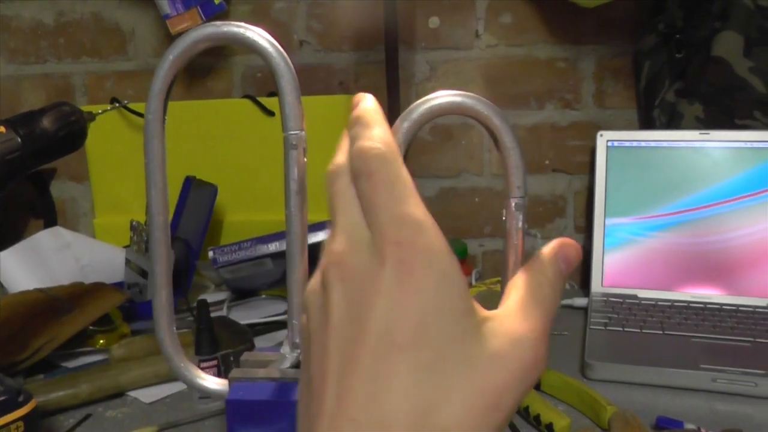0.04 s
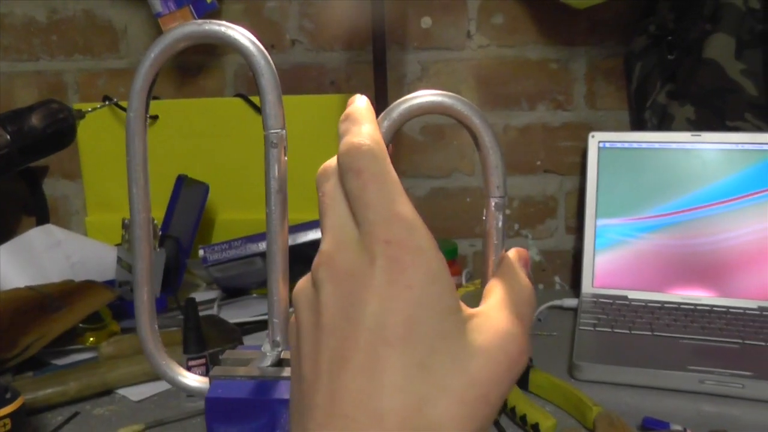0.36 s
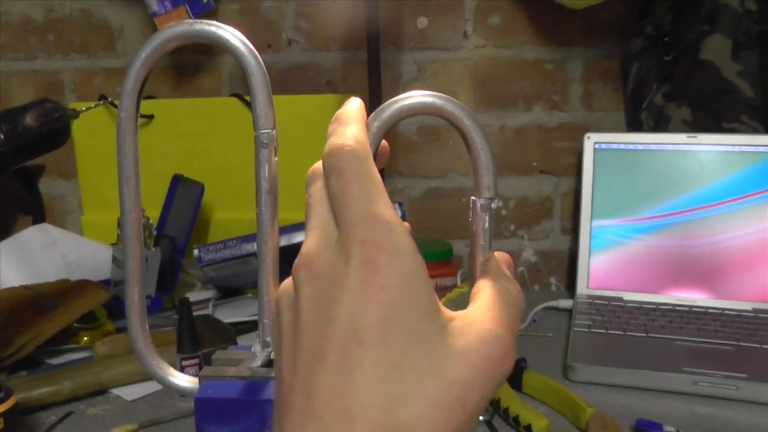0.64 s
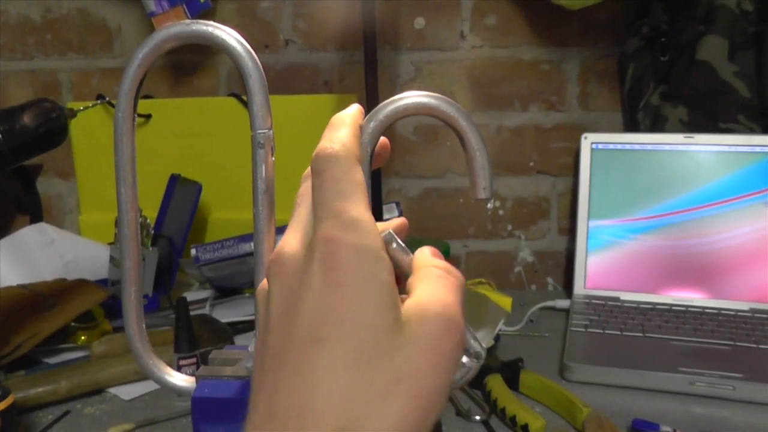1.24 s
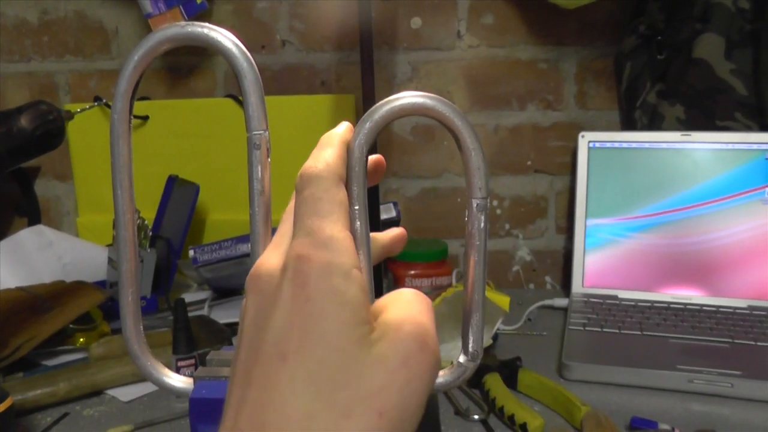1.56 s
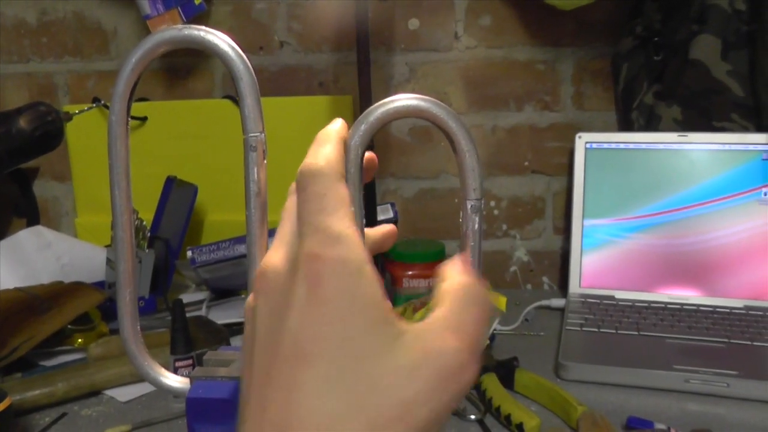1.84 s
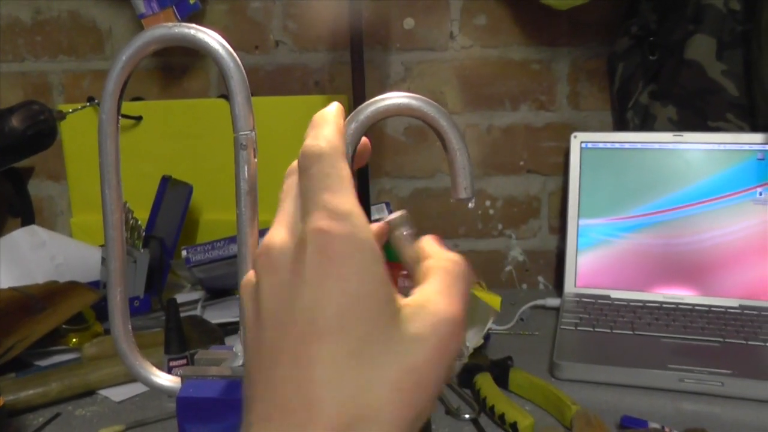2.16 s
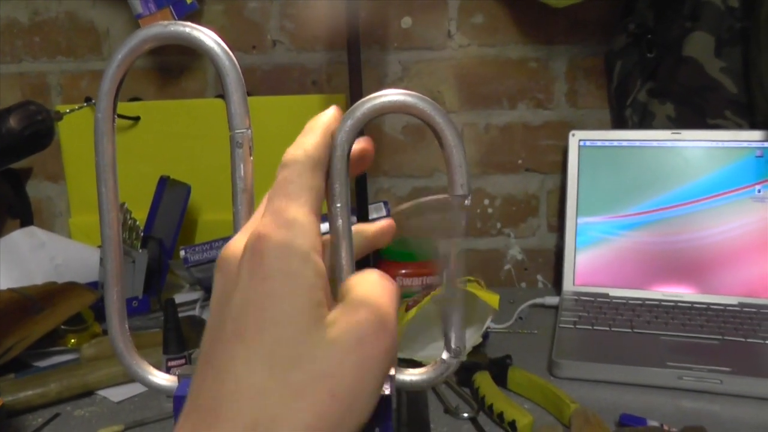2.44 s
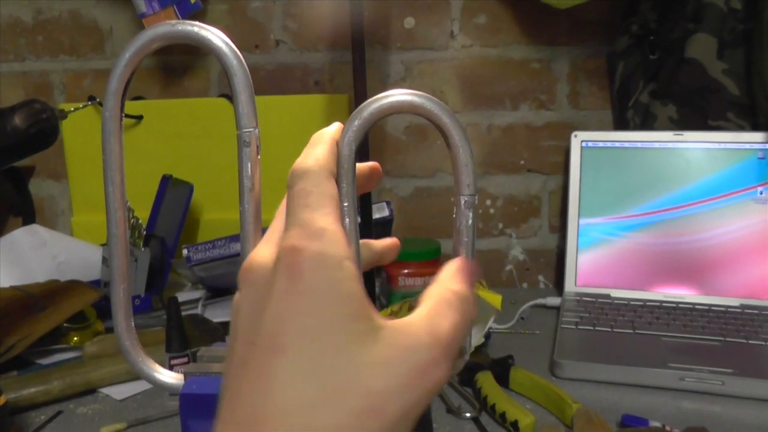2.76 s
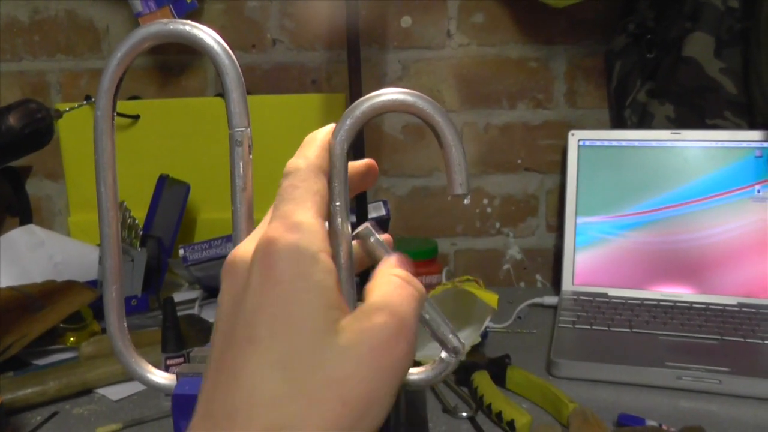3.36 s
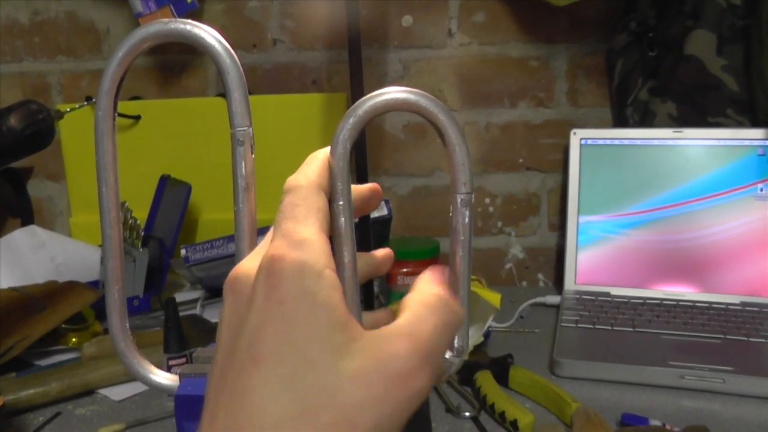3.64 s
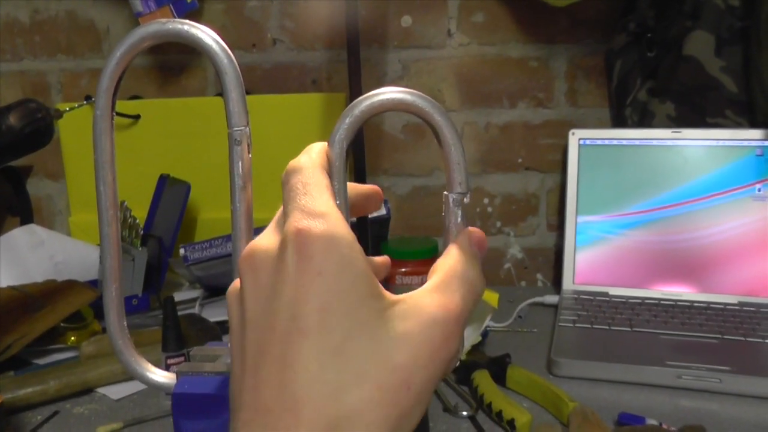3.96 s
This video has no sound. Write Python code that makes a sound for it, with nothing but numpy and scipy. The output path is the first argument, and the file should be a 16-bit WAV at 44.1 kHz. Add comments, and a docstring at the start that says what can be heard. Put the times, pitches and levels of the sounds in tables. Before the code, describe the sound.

Close up in a quiet workshop, a thumb opens a carabiner gate with small dull knocks and lets it spring shut with a crisp metallic click. This happens three times at an even pace, over a very faint hum.

```python
"""A small knock sounds over a faint hum: a thumb is pushing open the sprung gate of a metal carabiner.
Three times the gate opens, with knocks and an occasional squeak, then slips free, swings back,
grazes the nose and snaps shut. Each impact excites the damped modes of the frame, and the small,
quiet workshop answers with brief reflections and a low boom."""
import sys
import numpy as np
from scipy import signal
from scipy.fft import rfft, irfft
from scipy.io import wavfile

SR = 44100
rng = np.random.default_rng(int(sys.argv[2]) if len(sys.argv) > 2 else 0)


def master_out(mix):
    """Clip the mix to full scale and print it as 16-bit PCM to the path in sys.argv[1]."""
    frames = np.transpose(np.atleast_2d(mix))
    ceiling = np.clip(frames, -1, 1)
    pcm = np.round(ceiling * 32767).astype(np.int16)
    wavfile.write(sys.argv[1], SR, pcm)


N = 176400
T = np.arange(N) / SR
AGE = np.arange(-SR // 20, SR // 2) / SR   # seconds around one event


# The gate hits the nose. Each row: time in seconds, level in dB, left minus right in dB,
# relative level of the lingering mode in dB.
SNAPS = [(1.5125, 2, 0.7, 2.5), (2.5412, 2.5, 0.9, 6.5), (3.495, 3, 0.3, -4)]
# Touches just before a hit. Each row: nominal lead in seconds, level in dB.
GRAZES = [(0.003, -17.5), (0.0009, -11.5)]
# Spectra of the hard first impact, the crack of metal on metal, and the jolt that shakes the
# microphones through the bench. Each row: frequency in Hz, gain in dB.
IMPACT_SPECTRUM = [(300, -8), (2000, -5.5), (6500, -4.5), (9000, 0), (16000, 1.5)]
CRACK_SPECTRUM = [(30, -13), (160, 0), (620, -9.5), (950, -0.5), (1900, -2.5), (2600, -6.5), (4300, -7),
                  (7200, 0.5), (7800, -11), (8600, 6), (11700, 2.5), (12700, -8.5), (14500, -6.5),
                  (16500, -25)]
JOLT_SPECTRUM = [(30, -6.5), (200, -2.5), (400, 3.5), (800, -8.5), (2000, -34.5)]
# Modes of the hand-damped frame and of the swinging gate.
# Each row: frequency in Hz, gain in dB, 60 dB decay time in seconds.
FRAME_MODES = [(1020, 6, .035), (1241, -4.5, 0.028), (1640, 2, .025), (1780, 6, 0.02), (3020, -4.5, .04),
               (3870, 2.5, .04), (4720, -6.5, 0.058), (5090, 1, .03), (6470, -1.5, .02), (6880, 6, 0.012),
               (11420, -4.5, .008)]
SWING_MODES = [(1150, -1, .05), (1700, -1, .02), (7895, -23, 0.0011)]
GRIND_RISE_S, GRIND_FALL_S = .0013, .0035

def snaps():
    """Impact excitation: the gate swings back, strikes the nose and grinds home; the frame rings."""
    lingering_hz, lingering_t60 = 2756, .37   # one mode escapes the hand
    out = np.zeros((2, N))
    for s, db, pan_db, lingering_db in SNAPS:
        grazes = sum(from_db(level) * click(-lead * rng.uniform(.85, .99)) for lead, level in GRAZES)
        impact = coloured(click(0), IMPACT_SPECTRUM)
        grind = friction(GRIND_RISE_S, GRIND_FALL_S)
        crack = coloured(impact + grazes + grind, CRACK_SPECTRUM)
        # no two hits excite the modes quite alike
        modes = [(hz, gain + 2 * rng.standard_normal(), t60) for hz, gain, t60 in FRAME_MODES]
        frame = ring(click(0), modes + [(lingering_hz, lingering_db, lingering_t60)])
        hinge = from_db(7.5) * ring(friction(rise_s=.007, fall_s=GRIND_FALL_S), SWING_MODES)
        jolt = np.array([coloured(friction(.0015, .0015), JOLT_SPECTRUM) for _ in range(2)])
        stereo_gain = from_db([[db + pan_db / 2], [db - pan_db / 2]])
        add(out, s, (crack + frame + hinge + jolt) * stereo_gain)
    return out


# The gate slips under the thumb. Each row: start in seconds, rise time in seconds,
# then the drive of thump, gate and tick, each in dB.
KNOCKS = [(0.4735, 0.0034, 0.5, -6, -21), (0.99, 0.0045, -6, -10.5, -29.5),
          (1.188, 0.0015, -40, -25, -42.5), (1.480, 0.0014, -18.5, -12, -31),
          (2.176, 0.0026, -0.5, 1.5, -18.5), (2.4996, .0017, -7.5, -2, -21.5), (3.135, 0.0038, 0, -8, -31),
          (3.167, 0.0008, -20, -40, -28.5), (3.2531, 0.002, -5.5, 0, -16.5),
          (3.328, 0.00096, -24, -12.5, -23), (3.339, 0.00095, -14, -12.5, -28.5),
          (3.4376, .0015, -26, -8.5, -34)]
# Soft bumps of the hand. Each row: time in seconds, level in dB.
BUMPS = [(1.702, -16), (2.084, -14), (2.115, -11), (2.72, -15)]
# Modes of hand and bench, of the gate and of the spring.
# Each row: frequency in Hz, gain in dB, 60 dB decay time in seconds.
THUMP_MODES = [(255, 1, 0.075), (407, -4.5, 0.038)]
GATE_MODES = [(743, -3, 0.029), (1002, -4.5, 0.019), (1260, -2, 0.028), (1717, 3.5, .022),
              (1980, -3.5, 0.026)]
SPRING_MODES = [(5160, 4.5, 0.047), (5720, -2, 0.0106)]
# Spectrum of a knock's tick. Each row: frequency in Hz, gain in dB.
TICK_SPECTRUM = [(150, -19.5), (500, -7.5), (1500, -9), (3200, -8), (4500, -9.5), (6800, 0), (7800, -11.5),
                 (10000, 4.5), (12000, -14.5), (16000, -12.5)]

def knocks():
    """Transient excitation: brief slips and bumps set hand, bench, gate and spring ringing."""
    forces = np.zeros((3, N))
    for s, rise, *levels_db in KNOCKS:
        age = np.clip(AGE / rise, 0, 40)
        envelope = np.sqrt(age) * np.exp(-age / 2)
        add(forces, s, from_db(levels_db)[:, None] * slips(envelope))
    thump, gate, tick = forces
    for s, db in BUMPS:
        add(thump, s, from_db(db) * click(0))
    lowpass = signal.butter(4, 1840, fs=SR, output="sos")   # keeps the knock's body dull
    body = ring(gate, GATE_MODES) + ring(thump, THUMP_MODES)
    out = signal.sosfilt(lowpass, body) + coloured(tick, TICK_SPECTRUM)
    twang = ring(friction(GRIND_RISE_S, GRIND_FALL_S), SPRING_MODES)
    add(out, 3.255, from_db(-4) * twang)   # the spring jumps once in its bore
    return out


# Hinge squeaks. Each row: peak time in seconds, half length in seconds, pitch in Hz, level in dB,
# extra gain of the overtones in dB.
SQUEAKS = [(2.176, 0.0049, 2190, -46.5, -22.5), (3.1055, 0.0058, 2252, -48.5, -10)]
# The squeak's harmonics, fundamental first. Each entry: gain in dB.
SQUEAK_HARMONICS = [3.5, 3, 11, 12.5, 12, 3, -8]

def squeaks():
    """Stick-slip oscillation: the dry hinge gives brief harmonic tones, rough in pitch and level."""
    out = np.zeros(N)
    for s, half, hz, db, overtones_db in SQUEAKS:
        pitch = hz * (1 + .018 * drift(1310, AGE))
        phase = 2 * np.pi * np.cumsum(pitch) / SR
        tone = sum(from_db(gain + overtones_db * (k > 1)) * np.sin(k * phase)
                   for k, gain in enumerate(SQUEAK_HARMONICS, start=1))
        rasp = 1 + .56 * drift(901, AGE)
        add(out, s, from_db(db) * tone * swell(half) * rasp)
    return out


# Each row: peak time in seconds, half length in seconds, level in dB, pitch in Hz.
SQUEAK_AND_HISSES = [(0.578, 0.014, -72.5, 2250), (1.043, 0.026, -73, 6540), (2.28, 0.077, -77.5, 10500),
                     (3.15, 0.066, -71.5, 6700), (3.214, .025, -72, 10100)]

def squeak_and_hisses():
    """Narrow-band noise: a faint squeak, then soft high hisses of the sliding thumb."""
    decay_cycles = 16
    out = np.zeros(N)
    for s, half, db, hz in SQUEAK_AND_HISSES:
        band = ring(rng.standard_normal(len(AGE)), [(hz, 0, decay_cycles / hz)])
        add(out, s, from_db(db) * band / band.std() * swell(half))
    return out


# Spectra of the echoes from bench and walls. Each row: frequency in Hz, gain in dB.
BENCH_SPECTRUM = [(100, -1), (1000, -4.5), (5000, 0.5), (16000, -4.5)]
WALL_SPECTRUM = [(60, -11), (250, -2), (1800, -6), (3400, -6), (5800, -6), (9500, -10.5), (12000, -15),
                 (16000, -15.5)]

def reflections(direct):
    """Reverberation as convolution: the bench answers at once, the walls later and for longer."""
    bench = echoes(BENCH_SPECTRUM, t60=.022, lag_s=0)
    walls = echoes(WALL_SPECTRUM, t60=.18, lag_s=.0071)
    return signal.fftconvolve(direct, bench + walls, axes=1)[:, :N]


# Low room modes. Each row: frequency in Hz, gain in dB, 60 dB decay time in seconds.
ROOM_MODES = [(166.3, 9.5, .42), (187.5, 8.5, 0.83), (209.8, 8.5, 0.23), (218.5, 13, 0.27),
              (242.6, 10, .25)]

def room_boom():
    """Standing waves: each snap excites the low modes of the room a moment later."""
    push = np.zeros(N)
    for s, db, *_ in SNAPS:
        add(push, s, from_db(db) * click(delay_s=.0076))
    return ring(push, ROOM_MODES)


# Spectrum of the room's air. Each row: frequency in Hz, relative level in dB.
AIR_SPECTRUM = [(25, -18), (90, -9), (135, -13.5), (200, -3.5), (250, -16.5), (300, -4.5), (350, -16),
                (600, -18.5), (850, -15), (2000, -26.5), (4300, -40.5), (5600, -28.5), (7700, -35.5),
                (9500, -30.5), (15000, -33.5), (16500, -50)]
# The hum swells and fades. Each row: time in seconds, level in dB.
HUM_LEVELS = [(0, -81), (.65, -70), (1.3, -78), (1.8, -71), (2.1, -63.5), (2.35, -74), (3.05, -83),
              (3.75, -76)]

def background():
    """Ambient noise: steady room air under a hum that wavers by random frequency modulation."""
    air = np.array([unit(coloured(c, AIR_SPECTRUM)) for c in wide_noise(np.ones(N))]) * np.sqrt(N)
    hum_hz = 139.3 + 1.3 * drift(16, T)
    hum = np.sqrt(2) * np.sin(2 * np.pi * np.cumsum(hum_hz) / SR)
    hum_db = np.interp(T, *np.transpose(HUM_LEVELS))
    return from_db(-69) * air + from_db(hum_db) * hum


# Stereo width of air and echoes. Each row: frequency in Hz, side relative to mid in dB.
WIDTH = [(100, -13.5), (600, -4.5), (1600, -13), (5000, -10.5), (9000, -0.5)]

def wide_noise(envelope):
    """Partial coherence: mid and side noises share the energy, widest in the treble."""
    mid, side = (unit(envelope * w) for w in rng.standard_normal((2, len(envelope))))
    mid = coloured(mid, [(hz, -10 * np.log10(1 + from_db(db) ** 2)) for hz, db in WIDTH])
    side = coloured(side, [(hz, -10 * np.log10(1 + from_db(-db) ** 2)) for hz, db in WIDTH])
    return np.array([mid + side, mid - side])


def echoes(spectrum, t60, lag_s):
    """Diffuse decay: dense echoes merge into exponentially dying stereo noise."""
    t = T[:SR // 3]
    decay = np.exp(-np.log(1000) * t / t60) * (t > lag_s)
    return np.array([coloured(c, spectrum) for c in wide_noise(decay)])


def friction(rise_s, fall_s):
    """Sliding friction: slips swell and die exponentially."""
    return slips(np.exp(-np.minimum(np.maximum(-AGE / rise_s, AGE / fall_s), 20)))


def slips(envelope):
    """Broadband forcing: a run of tiny slips, whitened to favour no pitch, with unit energy."""
    force = rng.standard_normal(len(envelope)) * envelope
    window = np.tanh(10 * (envelope / envelope.max()))
    for _ in range(2):
        flat_spectrum = np.exp(1j * np.angle(rfft(force)))
        force = irfft(flat_spectrum, len(force)) * window
    return unit(force)


def click(delay_s):
    """Unit impulse: one ideal contact."""
    return 1.0 * (np.arange(len(AGE)) == SR // 20 + int(delay_s * SR))


def ring(force, modes):
    """Modal superposition: damped resonators respond in parallel to one force."""
    out = 0
    for hz, db, t60 in modes:
        radius = from_db(-60 / (t60 * SR))
        poles = [1, -2 * radius * np.cos(2 * np.pi * hz / SR), radius ** 2]
        gain = from_db(db) * (1 - radius ** 2) / 2
        out = out + gain * signal.lfilter([1, 0, -1], poles, force + 1e-18)
    return out


def coloured(x, points):
    """Minimum-phase filtering: a causal response follows the (Hz, dB) points."""
    size = 8192
    hz, db = np.transpose(points)
    grid = np.maximum(np.arange(size // 2 + 1) * SR / size, 1)
    gain = from_db(np.interp(np.log(grid), np.log(hz), db))
    cepstrum = irfft(np.log(gain))
    cepstrum[1:size // 2] *= 2
    cepstrum[size // 2 + 1:] = 0
    response = irfft(np.exp(rfft(cepstrum)))[:size // 2]
    return signal.fftconvolve(x, response)[:len(x)]


def drift(rate_hz, t):
    """Random modulation with a spread of about one."""
    return np.interp((t - t[0]) * rate_hz, np.arange(4096), rng.standard_normal(4096))


def swell(half_s):
    """Gaussian envelope around an event."""
    return np.exp(-np.minimum((AGE / half_s) ** 2, 20))


def from_db(db):
    """Decibels as an amplitude ratio."""
    return 10 ** (np.asarray(db) / 20)


def unit(x):
    """Normalisation to unit energy."""
    return x / np.sqrt(np.sum(x ** 2) + 1e-20)


def add(track, s, sound):
    """Superposition: one event joins the track at s seconds."""
    start = int(s * SR) - SR // 20
    part = sound[..., :N - start]
    track[..., start:start + part.shape[-1]] += part


def scene():
    """Superposition of the carabiner's direct sound, its reflections, room modes and background."""
    metal = snaps() + knocks() + squeaks() + squeak_and_hisses()
    left_delay_s = 13e-6   # the direct sound arrives on the right first
    hz = np.arange(N // 2 + 1) * SR / N
    left = irfft(rfft(metal[0]) * np.exp(-2j * np.pi * hz * left_delay_s), N)
    return np.array([left, metal[1]]) + reflections(metal) + room_boom() + background()


def record(dry):
    """Band limiting: a steep low-pass filter stops everything above 17 kHz."""
    return signal.sosfilt(signal.cheby2(14, 60, 17000, fs=SR, output="sos"), dry)


dry = scene()
out = record(dry)
master_out(out)
```